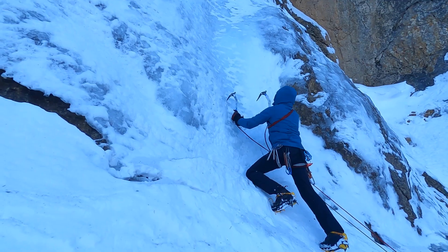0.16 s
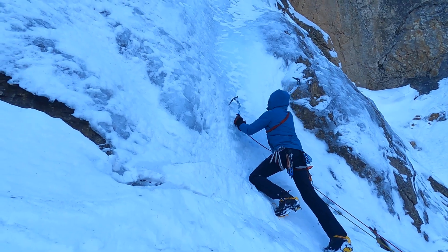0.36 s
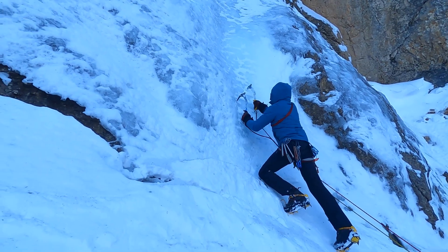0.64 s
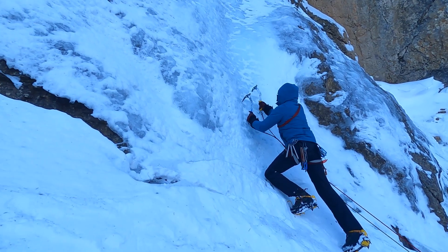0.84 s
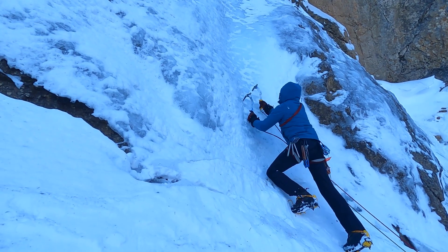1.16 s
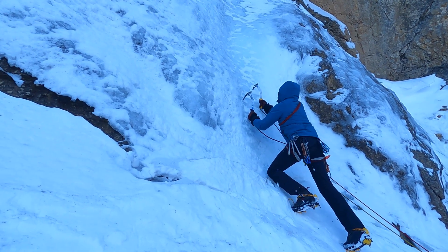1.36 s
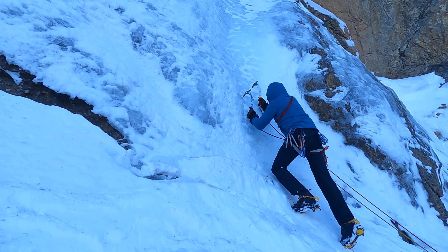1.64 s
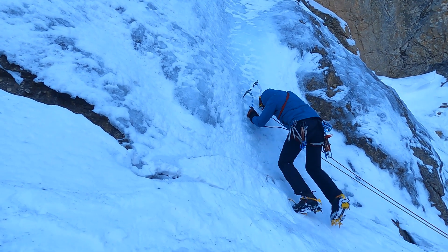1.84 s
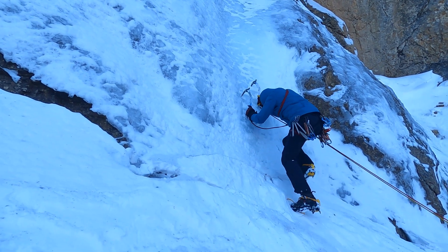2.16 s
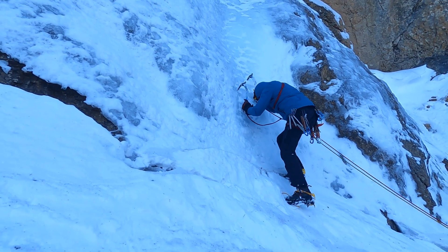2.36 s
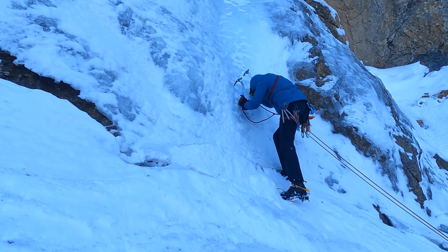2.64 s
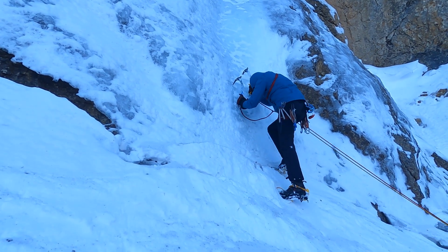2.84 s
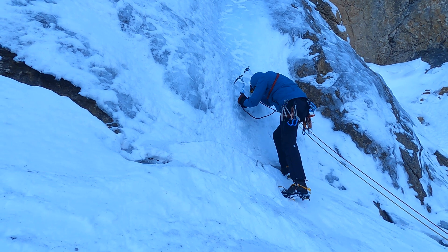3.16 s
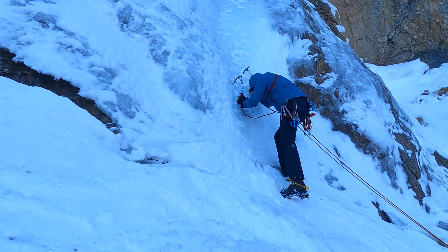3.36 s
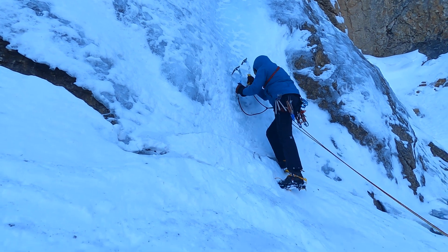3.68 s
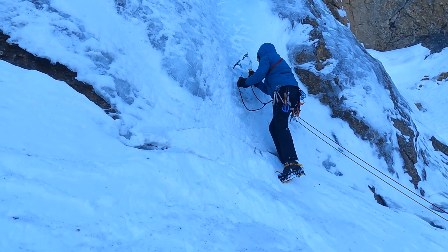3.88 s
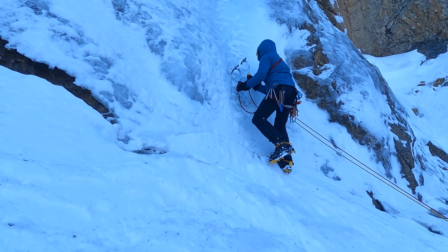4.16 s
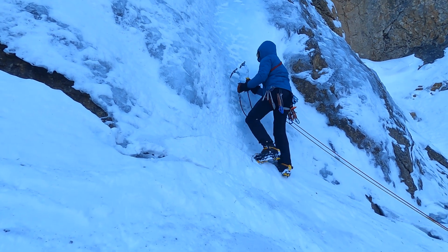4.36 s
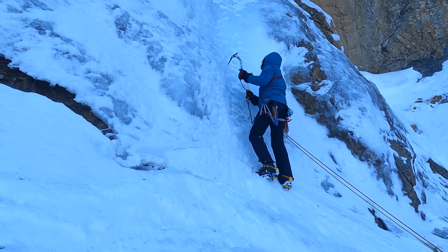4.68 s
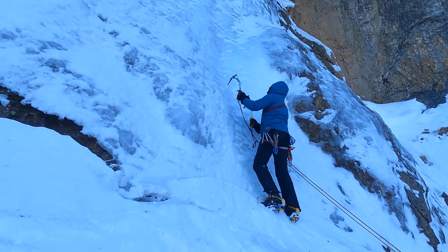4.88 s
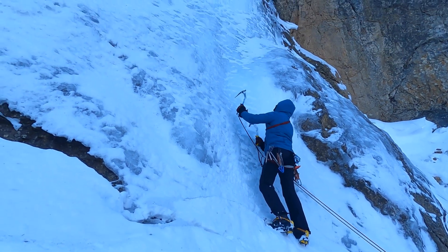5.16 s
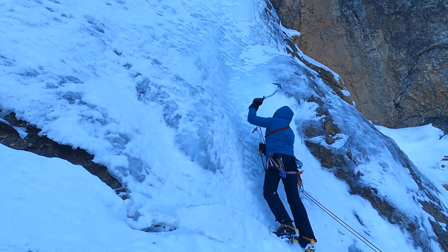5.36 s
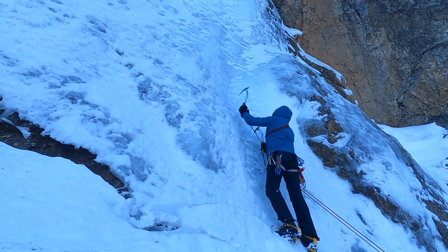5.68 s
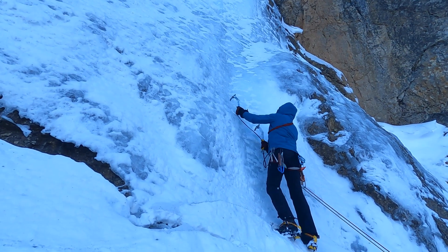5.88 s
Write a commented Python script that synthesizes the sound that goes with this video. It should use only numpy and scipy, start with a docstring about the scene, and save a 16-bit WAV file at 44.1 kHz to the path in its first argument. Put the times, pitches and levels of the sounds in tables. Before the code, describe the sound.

An axe pick cracks hard into ice, then boots crunch and knock in packed snow with gear clinking, under low wind rumble.

```python
"""Frozen gully, heard from close to the body of a climber working up it.
Wind rumbles on the microphone over a faint hiss: both are coloured noise. The stiff jacket rustles in grains.
Metal gear on the harness rings in damped sines. Crampons knock (damped sines), crunch and scrape (grains).
Axe picks crack into the ice: dense fractures, ringing steel, then a spray of loosened ice."""
import sys
import numpy as np
from scipy import signal
from scipy.fft import rfft, irfft, next_fast_len
from scipy.io import wavfile
from scipy.ndimage import uniform_filter1d

SR = 44100
rng = np.random.default_rng(int(sys.argv[2]) if len(sys.argv) > 2 else 0)


def wav_record(signal):
    """Record a signal, one row per channel, as 16-bit PCM in the file named by sys.argv[1]."""
    frames = np.transpose(np.atleast_2d(signal))
    bounded = np.clip(frames, -1, 1)
    # unit amplitude maps onto the largest positive 16-bit level
    quanta = np.round(bounded * 32767).astype(np.int16)
    wavfile.write(sys.argv[1], SR, quanta)


N = 265482
TIME = np.arange(N) / SR
SIZE = next_fast_len(N + 2 * 2 ** 13) // 2 * 2  # padded transform, even
BINS_HZ = np.maximum(np.arange(SIZE // 2 + 1) * SR / SIZE, 1)


def from_db(db):
    """Decibels to gain."""
    return 10 ** (np.asarray(db) / 20)


def rms_one(x):
    """Scale to unit power."""
    return x / np.sqrt(np.mean(x ** 2) + 1e-20)


def over_hz(points):
    """Read a table along log frequency."""
    hz, value = np.transpose(points)
    return np.interp(np.log(BINS_HZ), np.log(hz), value)


def causal(colour):
    """Minimum-phase response of a colour: nothing sounds before its cause."""
    cepstrum = irfft(np.log(from_db(over_hz(colour))), SIZE)
    cepstrum[1:SIZE // 2] *= 2
    cepstrum[SIZE // 2 + 1:] = 0
    return np.exp(rfft(cepstrum))


def coloured(x, colour):
    """Give a white signal a colour and keep its power."""
    response = causal(colour)
    response_rms = np.sqrt(np.mean(abs(response) ** 2))
    return irfft(rfft(x, SIZE) * response / response_rms, SIZE)[:N]


def in_time(rows):
    """Gain curve from rows of start_s, level_db."""
    start_s, level_db = np.transpose(rows)
    return from_db(np.interp(TIME, start_s, level_db))


def drift(knots_per_s):
    """Smooth chance: straight lines between normal draws of spread 1."""
    knots = rng.standard_normal(N // 20)
    return np.interp(TIME * knots_per_s, np.arange(len(knots)), knots)


def grains(per_s, spread_db, clump_db):
    """Tiny fractures of uneven size whose strength comes in clumps; unit power."""
    sizes = from_db(spread_db * np.minimum(rng.exponential(1, N), 4)) * rng.choice([-1, 1], N)
    happens = rng.random(N) < per_s / SR
    return rms_one(sizes * happens * from_db(clump_db * drift(170)))


def burst(source, start_s, length_s, rise_s, t60_s):
    """A stretch of a source that swells, holds at unit power and dies away."""
    first = int(max(start_s, 0) * SR)
    t = TIME[:min(N - first, int((length_s + 2 * t60_s) * SR) + 2)]
    swell = np.minimum((t + 1 / SR) / rise_s, 1)
    shape = swell * from_db(-60 * np.maximum(t - length_s, 0) / t60_s)
    piece = source[first:first + len(t)] * shape
    out = np.zeros(N)
    out[first:first + len(t)] = piece * np.sqrt(np.sum(shape ** 2) / (np.sum(piece ** 2) + 1e-12))
    return out


def resonant(x, hz, q):
    """Pass a signal through one broad resonance."""
    return signal.lfilter(*signal.iirpeak(hz, max(q, 1), fs=SR), x + 1e-18)


def add(out, start_s, peak_db, hz, t60_s):
    """Add a damped sine in place."""
    stretch = out[int(start_s * SR):][:int(1.5 * t60_s * SR)]
    t = TIME[:len(stretch)]
    stretch += np.sin(2 * np.pi * hz * t) * from_db(peak_db - 60 * t / t60_s)


# breeze between gusts, before BREEZE_TRIM_DB: start_s, level_db
BREEZE = [(0.0, -37.5), (0.28, -41), (0.44, -33), (0.79, -30.5), (0.95, -47), (1.94, -51.5), (2.31, -50),
          (2.53, -39.5), (2.95, -45), (3.27, -44), (3.91, -36), (4.19, -34.5), (4.63, -45), (5.06, -43.5),
          (5.38, -47), (5.73, -47), (6.02, -48)]
# puffs of air: peak_s, level_db, half_length_s
GUSTS = [(0.01, -37, 0.074), (0.283, -29.5, 0.048), (0.926, -33.5, 0.051), (1.35, -41.5, 0.091),
         (1.749, -35, 0.024), (2.322, -29, 0.037), (3.089, -29.5, 0.038), (3.728, -34.5, 0.051),
         (5.67, -37, 0.081)]
BREEZE_TRIM_DB = 0.5


def wind_strength():
    """Each puff swells and fades as a bell; its power adds to the breeze."""
    power = (from_db(BREEZE_TRIM_DB) * in_time(BREEZE)) ** 2
    for peak_s, level_db, half_s in GUSTS:
        power += from_db(level_db) ** 2 * np.exp(-((TIME - peak_s) / half_s) ** 2)
    return np.sqrt(power)


# spectra, relative: freq_hz, level_db
WIND_COLOUR = [(12, -25), (25, 1), (43, 2.5), (75, -7), (130, -16), (225, -25.5), (300, -40.5), (1000, -66)]
HISS_COLOUR = [(100, 6.5), (450, 4.5), (800, -5), (1450, 7), (2600, -1), (4500, -23), (8000, -21),
               (14000, -10.5)]
HISS_DB = -68


def air(own_db=-9, lump_db=4.0, waver_db=2.5):
    """Lumpy wind and wavering hiss common to both ports, plus small eddies each port catches alone."""
    swirl = np.array([coloured(rng.standard_normal(N), WIND_COLOUR) for _ in range(3)])
    swirl *= from_db(lump_db * drift(35))
    local_rms = np.sqrt(abs(uniform_filter1d(swirl ** 2, size=5000)) + 1e-9)
    wind = wind_strength() * swirl / local_rms
    hiss = from_db(HISS_DB + waver_db * drift(48)) * coloured(rng.standard_normal(N), HISS_COLOUR)
    return wind[0] + hiss, from_db(own_db) * wind[1:]


# climber's briskness, as crinkle level before CRINKLE_TRIM_DB: start_s, level_db
MOVEMENT = [(0.0, -64.5), (0.5, -61), (1.08, -62), (1.32, -61), (1.68, -58.5), (2.0, -62), (2.28, -54.5),
            (2.45, -58.5), (2.52, -59), (2.75, -62.5), (2.92, -60.5), (3.07, -57.5), (3.96, -62),
            (4.36, -56.5), (4.55, -56), (4.65, -60), (5.2, -62.5), (5.73, -62), (6.02, -63)]
# spectra, relative; GRIT_COLOUR also colours the ice grit: freq_hz, level_db
RUB_COLOUR = [(150, 0.5), (500, -15.5), (850, -2), (1450, 7), (2100, 0.5), (3500, -4.5), (8000, -50)]
GRIT_COLOUR = [(500, -34), (2500, -10), (4400, 2.5), (7000, 2.5), (9500, -2), (14000, -9.5)]
RUB_TRIM_DB, CRINKLE_TRIM_DB = -3, 2
RUB_DB_PER_MOVEMENT_DB = 0.78


def jacket(flutter_db=2.3, crackle_db=-7, crease_q=7):
    """Stiff cloth rubs and crinkles unevenly as folds catch and let go; creases pop at seven pitches."""
    crinkle = in_time(MOVEMENT) * from_db(flutter_db * drift(21.55))
    mean = crinkle.mean()
    rub = mean * (crinkle / mean) ** RUB_DB_PER_MOVEMENT_DB
    creases = sum(resonant(grains(40, 2.5, 1.5), hz, crease_q) for hz in np.geomspace(4200, 9000, num=7))
    cloth = grains(7000, 2, 1.7) + from_db(crackle_db) * rms_one(creases)
    rubbing = from_db(RUB_TRIM_DB) * rub * coloured(grains(4000, 1.5, 4.8), RUB_COLOUR)
    crinkling = from_db(CRINKLE_TRIM_DB) * crinkle * coloured(cloth, GRIT_COLOUR)
    return rubbing + crinkling


# centres of the random spread in strength and pitch
BUMPS_FROM_S, BUMPS_TO_S, BUMP_DB, BUMP_HZ, BUMP_T60_S = 2.1, 5.3, -39, 191.5, 0.063


def bumps(spread_db=4, spread_octaves=0.28, count=26):
    """Packed snow gives in soft low bumps, at random, while weight shifts between the boots."""
    out = np.zeros(N)
    for when, force, pitch in rng.random((count, 3)):
        start_s = BUMPS_FROM_S + when * (BUMPS_TO_S - BUMPS_FROM_S)
        peak_db = BUMP_DB + spread_db * (2 * force - 1)
        add(out, start_s, peak_db, BUMP_HZ * 2 ** (spread_octaves * (2 * pitch - 1)), BUMP_T60_S)
    return out


# grazing gear as the hips swing: start_s, level_db, mode_name, length_s, looseness_0_to_1
RATTLES = [(2.091, -58, "B", 0.064, 0.24), (2.146, -59, "G", 0.056, 0.6), (2.334, -46.5, "D", 0.02, 0.9),
           (2.387, -45, "D", 0.024, 1), (2.338, -58.5, "G", 0.1, 0.6), (2.439, -48, "D", 0.02, 0.9),
           (2.888, -66, "G", 0.065, 0.4), (2.941, -51, "D", 0.013, 0.8), (3.017, -57, "B", 0.08, 0),
           (3.177, -65, "G", 0.065, 0.6), (3.24, -63, "B", 0.24, 0.3), (3.322, -56.5, "G", 0.061, 0.1),
           (3.498, -50.5, "D", 0.036, 0.3), (3.61, -63, "G", 0.037, 0.2), (3.702, -56, "B", 0.044, 0.2),
           (3.817, -61, "B", 0.09, 0.2), (4.442, -59.5, "B", 0.028, 0.1), (4.75, -68.5, "B", 0.075, 0.2),
           (4.949, -66, "B", 0.14, 0.1), (5.845, -62.5, "B", 0.13, 0.4), (5.974, -54.5, "E", 0.013, 0.1)]
# ringing of screws and karabiners, by mode_name: pitch_hz, t60_s
GEAR_MODES = {"A": (4290, 0.05), "B": (4378, 0.21), "C": (4700, 0.036), "D": (5085, 0.085),
              "E": (6600, 0.081), "F": (7490, 0.06), "G": (8800, 0.08), "H": (9225, 0.039),
              "I": (3580, 0.021), "J": (5730, 0.048)}
GRAZES_PER_S = 300


def rattles(swell_s=0.0019, twin_hz=105, fade_db_per_s=25, flutter_db=3):
    """Runs of tiny touches make a ring swell, waver and fade; loose pieces stir neighbouring modes too."""
    out = np.zeros(N)
    for start_s, level_db, mode, length_s, looseness in RATTLES:
        hz, t60_s = GEAR_MODES[mode]
        chatter = 0
        for shift_hz, share in ((0, 1), (-twin_hz, looseness), (2 * twin_hz, looseness)):
            ring = np.zeros(SR // 3)
            add(ring, 0, 0, hz + shift_hz, t60_s)
            touches = rng.standard_normal(SR) * (rng.random(SR) < GRAZES_PER_S / SR)
            chatter += share * signal.fftconvolve(touches, ring, "valid")
        # steady pressure between the pieces keeps the ring going
        chatter /= np.sqrt(abs(uniform_filter1d(chatter ** 2, size=4500)) + 1e-9)
        chatter *= from_db(-fade_db_per_s * TIME[:len(chatter)])
        placed = np.pad(chatter, (int(start_s * SR), N))
        out += from_db(level_db) * burst(placed, start_s, length_s, swell_s, t60_s)
    return out * from_db(flutter_db * drift(75))


# gear touching: start_s, peak_db, strongest_mode_name
CLINKS = [(0.75, -33, "A"), (1.585, -43.5, "C"), (2.115, -45, "F"), (2.2377, -34, "H"), (2.238, -40.5, "E"),
          (2.405, -36.5, "J"), (2.981, -39, "I"), (2.995, -43, "B"), (3.1694, -38, "C"), (3.172, -42, "H"),
          (4.018, -31, "E"), (4.021, -41, "A"), (4.0696, -35.5, "A"), (4.07, -41, "H"), (6.012, -45.5, "C")]


def gear(others_db=-19, others_spread_db=3, wander_hz=12):
    """Each touch sets one mode ringing strongly and the rest faintly."""
    out = np.zeros(N)
    for start_s, peak_db, mode in CLINKS:
        for name, (hz, t60_s) in GEAR_MODES.items():
            weaker_db = (name != mode) * (others_db + rng.normal(0, others_spread_db))
            add(out, start_s, peak_db + weaker_db, hz + rng.normal(0, wander_hz), t60_s)
    return out


# boot dragged up through the crust: start_s, level_db
DRAG = [(4.3, -71), (4.335, -50.5), (4.38, -52), (4.454, -61), (4.51, -52.5), (4.57, -46.5), (4.6, -58.5),
        (4.635, -50.5), (4.66, -70), (4.77, -63), (4.83, -68), (5.0, -81)]
# spectra of crust and packed snow, relative, shared with boot sounds below: freq_hz, level_db
CRUNCH_COLOUR = [(120, 4.5), (300, 0), (430, -5.5), (580, 2.5), (780, -2.5), (960, 2.5), (1450, 4),
                 (2500, -9.5), (5000, -10.5), (12000, -37)]
BASS_COLOUR = [(40, -3), (90, -6), (160, 9.5), (300, -9), (480, -9.5), (2000, -61.5)]


def drag(bass_db=1.5, catch_db=3.0):
    """A boot ploughs through the crust in one unbroken scrape that catches and lets go."""
    dragging = (TIME > DRAG[0][0]) * (TIME < DRAG[-1][0])
    pressure = in_time(DRAG) * dragging * from_db(catch_db * drift(55))
    crust = coloured(grains(700, 1.9, 2.6), CRUNCH_COLOUR)
    packed = coloured(grains(760, 5.0, 2.8), BASS_COLOUR)
    return pressure * (crust + from_db(bass_db) * packed)


# boot sinking as packed snow sticks and slips: start_s, first_peak_db, length_s, slips_per_s
JUDDERS = [(2.302, -23.5, 0.087, 115), (2.561, -33.5, 0.094, 90), (3.058, -30.5, 0.063, 100),
           (4.546, -34, 0.085, 80)]


def judders(thump_hz=160, t60_s=0.038, fade_db=11, spread_db=0.5, spread_octaves=0.22,
            jitter=0.343, crumb_db=-13):
    """Each slip is a low thump and a spurt of coarse grains; slips are uneven and weaken as the boot settles."""
    crumbs, thumps, spurts = grains(5000, 5.6, 1), np.zeros(N), 0
    for start_s, peak_db, length_s, per_s in JUDDERS:
        t = 0
        for gap, force, pitch in rng.uniform(-1, 1, size=(20, 3)):
            if t < length_s:
                slip_db = peak_db - fade_db * t / length_s + spread_db * force
                add(thumps, start_s + t, slip_db, thump_hz * 2 ** (spread_octaves * pitch), t60_s)
                spurt = burst(crumbs, start_s + t, length_s=0.0019, rise_s=0.00079, t60_s=0.014)
                spurts += from_db(slip_db + crumb_db) * spurt
            t += (1 + jitter * gap) / per_s
    return thumps + coloured(spurts, CRUNCH_COLOUR)


# crust crushed as a boot shifts: start_s, level_db, length_s, bass_rel_db
CRUNCHES = [(0, -51, 0.02, -19), (1.68, -51.5, 0.037, -3), (1.78, -57.5, 0.056, -15),
            (2.539, -52, 0.06, 10), (2.751, -62, 0.11, 9), (2.869, -52.5, 0.019, 0),
            (3.139, -55, 0.027, -3), (3.195, -57, 0.072, 10), (3.362, -48.5, 0.015, 9),
            (3.743, -59, 0.044, 10), (4.182, -62, 0.016, -10), (4.681, -65.5, 0.089, 19),
            (4.844, -68.5, 0.037, 19.5), (4.928, -68.5, 0.028, 19.5)]
# crampon kicked home, also heard in grit and knocks:
# landing_s, level_db, lead_in_crust_s, hardness_db, thud_hz, thud_t60_s
KICKS = [(2.2802, -43.5, 0.019, -7.5, 141, 0.049), (3.0474, -39, 0.049, 2, 110, 0.053)]
KICK_CRUSH_S, KICK_BASS_DB = 0.051, 9  # dB relative to the kick
# ice loosened by each strike sprays down the wall;
# crunch dB relative to the strike, grit dB relative to strike plus steel ring
SPRAY_DELAY_S, SPRAY_S, SPRAY_CRUNCH_DB, SPRAY_GRIT_DB = 0.041, 0.03, -33, -34


def crunches(swell_share=0.12, t60_s=0.16, kick_swell_share=0.21, kick_t60_s=0.31):
    """The crust collapses in clumps of grains while packed snow beneath gives in coarser slips."""
    crust, slips, top, bass = grains(750, 1.7, 1.5), grains(900, 4.4, 2.6), 0, 0
    sprays = [(s + SPRAY_DELAY_S, db + SPRAY_CRUNCH_DB, SPRAY_S, 0) for s, db, *_ in STRIKES]
    for start_s, level_db, length_s, bass_db in CRUNCHES + sprays:
        rise_s = swell_share * length_s
        top += from_db(level_db) * burst(crust, start_s, length_s, rise_s, t60_s)
        bass += from_db(level_db + bass_db) * burst(slips, start_s, length_s, rise_s, t60_s)
    for landing_s, level_db, lead_s, *_ in KICKS:
        rise_s = lead_s + kick_swell_share * lead_s
        top += from_db(level_db) * burst(crust, landing_s - lead_s, KICK_CRUSH_S, rise_s, kick_t60_s)
        sinking = burst(slips, landing_s, KICK_CRUSH_S - lead_s, swell_share * KICK_CRUSH_S, kick_t60_s)
        bass += from_db(level_db + KICK_BASS_DB) * sinking
    return coloured(top, CRUNCH_COLOUR) + coloured(bass, BASS_COLOUR)


# ice chips snapping off, before TICK_TRIM_DB: start_s, level_db, centre_hz
TICKS = [(1.296, -40.5, 5500), (2.062, -40.5, 6950), (2.1148, -35.5, 7400), (2.625, -37, 5440),
         (2.756, -42, 8000), (2.9915, -32.5, 7000), (3.137, -33, 6500), (3.7902, -36, 5030),
         (4.0178, -26.5, 7100), (4.1174, -32, 5900), (4.274, -38, 4500), (4.3022, -37.5, 8500),
         (4.574, -33, 5500), (4.733, -34, 6500), (5.233, -39, 4500), (5.8206, -45, 5400)]
TICK_TRIM_DB = -2.5
KICK_GRIT_DB = -9  # relative to the kick
# points slip once more as the boot takes weight; dB relative to kick plus hardness
SLIP_DELAY_S, SLIP_S, SLIP_DB = 0.085, 0.021, -6.5


def grit(skid_s=0.093, tick_q=1.13):
    """Skidding points and spraying ice scrape brightly; slips and sprays louder on hard ice; chips tick."""
    sand, chips = grains(7000, 2.0, 0.83), grains(16000, 5.5, 1.9)
    skids = [(s - lead_s, db + KICK_GRIT_DB, skid_s) for s, db, lead_s, *_ in KICKS]
    slips = [(s + SLIP_DELAY_S, db + hard_db + SLIP_DB, SLIP_S) for s, db, _, hard_db, *_ in KICKS]
    sprays = [(s + SPRAY_DELAY_S, db + ring_db + SPRAY_GRIT_DB, SPRAY_S) for s, db, _, ring_db in STRIKES]
    out = np.zeros(N)
    for start_s, level_db, length_s in skids + slips + sprays:
        out += from_db(level_db) * burst(sand, start_s, length_s, rise_s=length_s / 2, t60_s=0.12)
    for start_s, level_db, hz in TICKS:
        chip = burst(chips, start_s, length_s=0.00048, rise_s=0.00016, t60_s=0.027)
        out += from_db(level_db + TICK_TRIM_DB) * resonant(chip, hz, tick_q)
    return coloured(out, GRIT_COLOUR)


# dull knocks of boots and shafts: start_s, peak_db, centre_hz, crispness_rel_db
KNOCKS = [(0.3171, -31.5, 544, -4.5), (0.433, -28, 570, -5.5), (0.6703, -30.5, 530, -9),
          (1.299, -36.5, 337, 2.5), (1.3, -38.5, 1400, -9), (2.083, -31, 550, -8), (2.28, -28.5, 960, -2),
          (2.305, -31, 610, -9), (2.4244, -25.5, 567, -14), (2.585, -31.5, 520, -20),
          (2.876, -39, 940, 3.5), (3.06, -39, 1210, 9), (3.096, -30.5, 626, -9), (3.799, -30, 534, -25),
          (4.357, -30.5, 564, -1), (4.637, -37.5, 576, -17), (5.3633, -30.5, 640, -5.5),
          (5.809, -29, 564, -12)]
# weight settling on a pick or boot: start_s, peak_db, pitch_hz, t60_s
THUDS = [(0.755, -15.5, 115.5, 0.12), (0.751, -11.5, 265, 0.021), (1.301, -31, 300, 0.015),
         (1.886, -39, 220, 0.054), (2.303, -24, 141.3, 0.19), (3.05, -22.5, 215, 0.043),
         (3.077, -20.5, 91, 0.087), (3.213, -27.5, 162.5, 0.11), (4.027, -24, 72.6, 0.34),
         (5.325, -36.5, 190, 0.11), (5.461, -38.5, 220, 0.04), (5.811, -30.5, 172, 0.058)]
# dB relative to kick plus hardness; crispness relative to the knock
KICK_THUD_DB, KICK_KNOCK_DB, KICK_KNOCK_HZ, KICK_CRISP_DB = 23, 8.5, 750, 4


def knocks(body_t60_s=0.014, thump_ratio=0.362, thump_db=-6.0, thump_t60_s=0.061, snap_db=-5,
           snap_t60_s=0.0018, crumble_db=-8, damping_octaves=0.67):
    """Blunt contacts ring a few cycles over a low thump, with snap and crumble by crispness; weight thuds."""
    crumbs, body, opposed, crumble = grains(6000, 2.3, 1.3), np.zeros(N), np.zeros(N), 0
    toes = [(s, db + hard_db + KICK_KNOCK_DB, KICK_KNOCK_HZ, KICK_CRISP_DB)
            for s, db, _, hard_db, *_ in KICKS]
    landings = [(s, db + hard_db + KICK_THUD_DB, hz, t60_s) for s, db, _, hard_db, hz, t60_s in KICKS]
    for start_s, peak_db, hz, crisp_db in KNOCKS + toes:
        damping = 2 ** rng.uniform(-damping_octaves, damping_octaves)
        add(body, start_s, peak_db, hz, body_t60_s * damping)
        add(opposed, start_s, peak_db + thump_db, hz * thump_ratio, thump_t60_s)
        add(opposed, start_s, peak_db + crisp_db + snap_db, hz, snap_t60_s)
        snow = burst(crumbs, start_s, length_s=0.0021, rise_s=0.0002, t60_s=0.023)
        crumble += from_db(peak_db + crisp_db + crumble_db) * snow
    for start_s, peak_db, hz, t60_s in THUDS + landings:
        add(opposed, start_s, peak_db, hz, t60_s)
    # neighbouring modes swing in opposite directions
    return body - opposed + coloured(crumble, CRUNCH_COLOUR)


# pick breaking into ice: start_s, level_db, fracture_length_s, steel_ring_rel_db
STRIKES = [(0.7371, -30.5, 0.0019, -2), (0.7396, -20, 0.0051, -1), (0.7517, -24, 0.0019, -10),
           (5.8046, -20, 0.003, 7)]
# steel pick and shaft held by the ice: pitch_hz, level_rel_db, t60_s
AXE_MODES = [(1980, -5, 0.02), (4147, -1.5, 0.022), (4290, -19, 0.018), (4600, -8, 0.02), (5180, -9, 0.02),
             (5390, 4, 0.016), (6100, -5, 0.023), (6440, -19, 0.021), (7440, -7, 0.023)]
# spectrum of the fractures, relative: freq_hz, level_db
CRACK_COLOUR = [(100, -45), (700, -2.5), (1400, 16.5), (2100, 11.5), (2850, 3), (4300, 11), (6000, 12.5),
                (9000, 6), (14000, -9.5)]
CRACK_T60_S = 0.013  # after the pick stops


def axes(splinter_db=-27, splinter_t60_s=0.081, brittle_hz=5600):
    """The pick breaks in through a few ms of fractures; the steel rings briefly and splinters fly."""
    fractures, cracks, steel = grains(20000, 0.88, 0.8), 0, 0
    for start_s, level_db, length_s, ring_db in STRIKES:
        bite = burst(fractures, start_s, length_s, rise_s=0.00032, t60_s=CRACK_T60_S)
        splinters = burst(fractures, start_s, length_s, rise_s=0.0092, t60_s=splinter_t60_s)
        bite += from_db(splinter_db) * splinters
        # hard ice: more steel ring, only the brittle core of the crack
        brittle = resonant(bite, brittle_hz, 1)
        cracks += from_db(level_db) * (brittle + from_db(-max(ring_db, 0)) * (bite - brittle))
        modes = np.zeros(N)
        for hz, mode_db, t60_s in AXE_MODES:
            add(modes, start_s + rng.uniform(0, 0.00094), level_db + ring_db + mode_db, hz, t60_s)
        # ring builds up while the pick drives in
        steel += modes * np.clip((TIME - start_s) / length_s, 0, 1)
    return coloured(cracks, CRACK_COLOUR) + steel


# colour of the short echo: freq_hz, gain_db
SCATTER_COLOUR = [(50, 5), (150, 14), (600, 12.5), (2700, 9), (4500, 2.5), (8000, -11)]


def scatter(spectrum, level_db=-19, t60_s=0.081):
    """Body and ice wall throw back a short diffuse echo, different at each port."""
    t = TIME[:SR // 8]
    echoes = rng.standard_normal((2, len(t))) * from_db(-60 * t / t60_s) * (t > .002)
    echoes /= np.sqrt(np.sum(echoes ** 2, axis=1, keepdims=True))
    return from_db(level_db) * spectrum * rfft(echoes, SIZE) * from_db(over_hz(SCATTER_COLOUR))


# microphone ports: freq_hz, left_minus_right_db
PORT_BALANCE = [(60, -3.5), (400, -5.5), (1300, -4.5), (2400, -8), (4400, -4), (8000, 0.9)]
# microphone ports: freq_hz, left_lead_rad
PORT_PHASE = [(20, 0), (350, 0), (900, -.5), (1500, -1.1), (2100, -1.9), (2700, -2.7), (3700, -2 * np.pi)]


def scene():
    """Sum the sources, add the short echo; the left port hears the midrange later and weaker."""
    common, eddies = air()
    surroundings = common + jacket() + bumps() + rattles() + gear()
    boots_and_axes = drag() + judders() + crunches() + grit() + knocks() + axes()
    spectrum = rfft(surroundings + boots_and_axes, SIZE)
    tilt = from_db(over_hz(PORT_BALANCE) / 2)
    left = spectrum * tilt * np.exp(1j * over_hz(PORT_PHASE))
    direct = np.array([left, spectrum / tilt])
    return irfft(direct + scatter(spectrum), SIZE)[:, :N] + eddies


# microphone response: freq_hz, gain_db
MIC_COLOUR = [(2100, -0.5), (2600, -1.5), (3200, -3), (4100, -1.5), (9300, 0.5), (11500, -11.5),
              (15000, -19.5)]
CHANNEL_NOISE_DB = -79.5  # faint noise, independent in each channel
CUTOFF_HZ = 15700


def record(dry):
    """Microphone dips in the upper midrange and dulls the top; faint noise per channel, then a steep low-pass."""
    heard = irfft(rfft(dry, SIZE) * causal(MIC_COLOUR), SIZE)[:, :N]
    heard += from_db(CHANNEL_NOISE_DB) * rng.standard_normal((2, N))
    return signal.sosfilt(signal.ellip(10, .1, 80, CUTOFF_HZ, fs=SR, output="sos"), heard)


dry = scene()
out = record(dry)
wav_record(out)
```